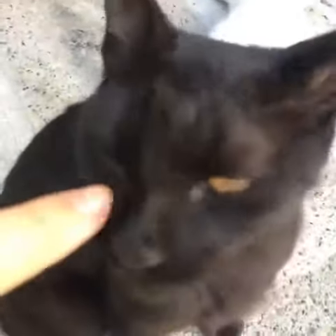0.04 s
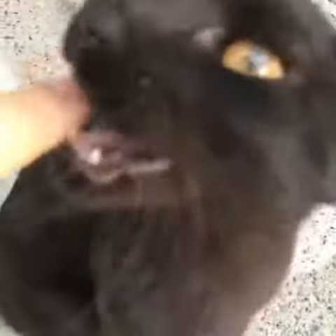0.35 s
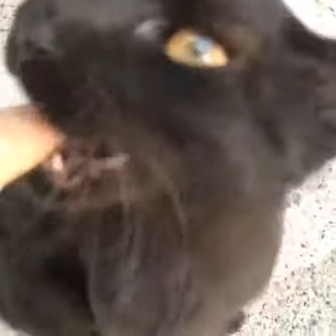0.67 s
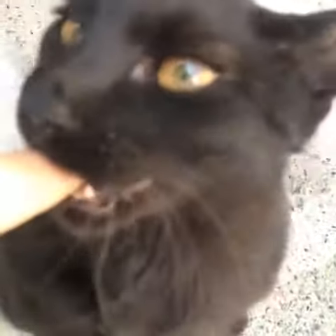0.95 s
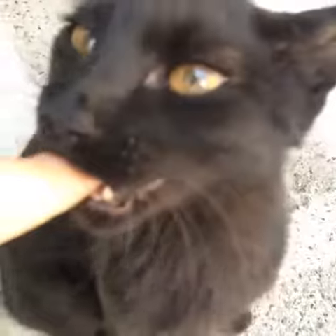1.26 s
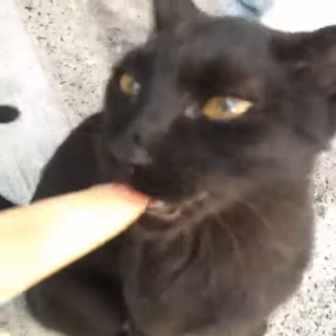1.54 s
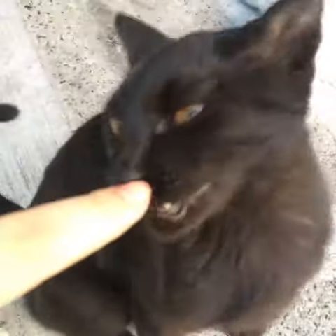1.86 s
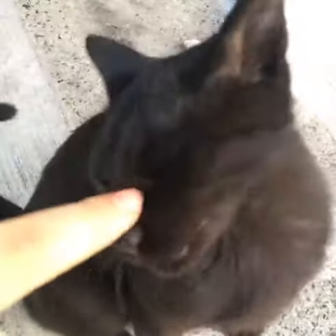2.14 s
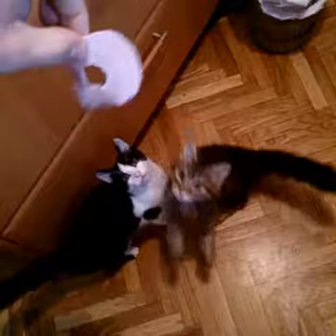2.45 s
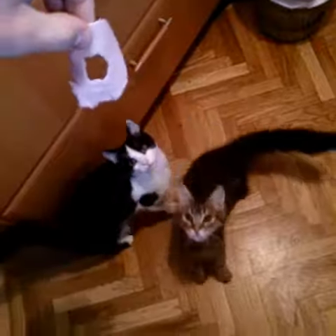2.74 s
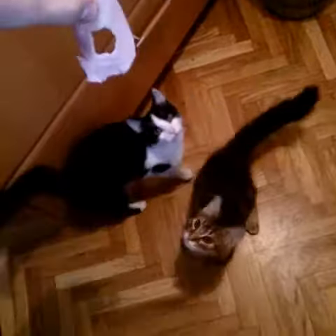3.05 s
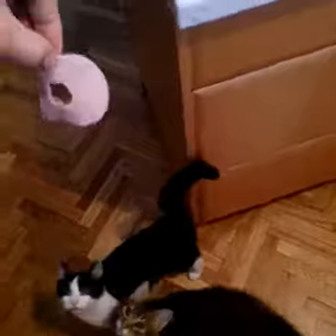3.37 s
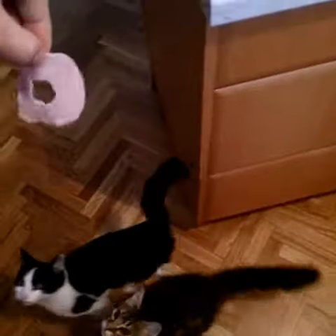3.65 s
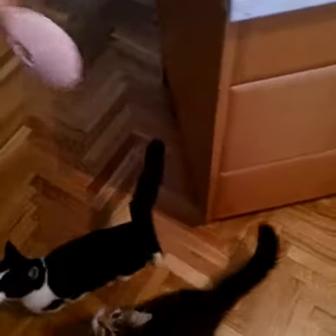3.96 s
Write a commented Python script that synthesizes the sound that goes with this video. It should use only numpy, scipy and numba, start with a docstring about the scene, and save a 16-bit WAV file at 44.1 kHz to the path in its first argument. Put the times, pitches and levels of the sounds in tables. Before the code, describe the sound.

A cat gives a dry rattling trill from 0.3 to 0.5 seconds, with small wet mouth clicks and a thin wheeze, then a longer, higher trill from 1.1 to 1.7. A louder outdoor rumble, a distant engine drone and soft wind thumps on the microphone run throughout this part. At 2.4 it cuts to a quiet room with faint electrical hum and light ticks at 2.5, 3.2 and 3.4.

```python
"""Outdoors, over a rumble and the drone of a distant engine, soft wind buffets hit the microphone.
A cat nibbles at a finger: first small wet mouth clicks, a thin airy wheeze and a dry rattling trill,
then, just after 1 s, a second, higher trill; each beat is a rasp and a snap that ring the mouth.
At 2.4 s the scene cuts to a quiet room with mains hum, where three light ticks follow."""
import sys
import numpy as np
from scipy import signal
from scipy.fft import rfft, irfft
from scipy.io import wavfile
from scipy.ndimage import uniform_filter1d
from numba import njit

SR = 44100
rng = np.random.default_rng(int(sys.argv[2]) if len(sys.argv) > 2 else 0)


def to_wav(sig):
    """Store sig (one row per channel, or 1-D mono) as 16-bit WAV at the path in sys.argv[1].

    Samples outside -1..1 are clipped; the rate is SR.
    """
    pcm = np.clip(np.atleast_2d(sig), -1, 1) * 32767
    pcm = np.round(pcm).astype(np.int16)
    wavfile.write(sys.argv[1], SR, pcm.T)  # frames by channels


N = 176400
CUT_S = 2.403

# spectrum of the outdoor rumble (frequency [Hz], relative level [dB])
RUMBLE_SPECTRUM = [(12, -37), (38, -16), (56, -2.5), (101, -1.5), (163, -5), (196, -4.5), (293, -12),
                   (326, -16.5), (373, -10), (404, -17), (558, -24.5), (621, -19.5), (673, -24.5),
                   (1120, -28.5), (1210, -28.5), (3730, -44.5), (15000, -65.5)]
# course of its bass, middle and treble (time [s], relative level [dB])
BASS_LEVEL = [(0, -42), (.15, -47), (.25, -43.5), (.55, -44), (.63, -41), (.76, -44.5), (.95, -48),
              (1.07, -45), (1.3, -45), (1.7, -43), (2.05, -47), (2.14, -44.5), (2.39, -45)]
MIDDLE_LEVEL = [(0, -46), (.3, -43.5), (.8, -45), (1.5, -46), (2.0, -48.5), (2.39, -50.5)]
TREBLE_LEVEL = [(0, -59.5), (.5, -59.5), (1.1, -61), (1.8, -60), (2.4, -62)]
# a low moan and a faint rustle that come up late in the rumble (time [s], level [dB])
MOAN_LEVEL = [(1.3, -68), (1.6, -54), (2.1, -57.5), (2.4, -56.5)]
RUSTLE_LEVEL = [(1.55, -87), (1.85, -80), (2.13, -84), (2.25, -83), (2.4, -78.5)]
# drone lines of the distant engine (frequency [Hz], relative level [dB])
ENGINE_LINES = [(194, -52.5), (246, -55), (291, -58), (466, -63.5)]
# swell of its lowest line and of its whine (time [s], relative level [dB])
ENGINE_SWELL = [(0, -55), (.27, -40.5), (.5, -45.5), (.7, -49), (1.0, -46.5), (1.47, -50.5), (1.6, -43.5),
                (1.83, -42.5), (2.05, -54), (2.39, -60)]
WHINE_LEVEL = [(0, -55), (.4, -58), (1.0, -56), (1.6, -54.5), (2.05, -49.5), (2.4, -58.5)]
# wind on the microphone (time [s], envelope peak [dB], frequency [Hz])
WIND_BUFFETS = [(.176, -31, 134), (0.707, -28.5, 82), (0.808, -30.5, 99), (.892, -26.5, 105),
                (.995, -31, 140), (1.194, -34, 91), (2.219, -34.5, 124)]

# spectrum of the room tone (frequency [Hz], relative level [dB])
ROOM_SPECTRUM = [(12, 5), (22, 3), (38, -3.5), (70, -15), (110, -21.5), (250, -23.5), (420, -28),
                 (1000, -29), (1500, -33.5), (2100, -32), (3300, -38), (6000, -38.5), (10000, -41),
                 (15500, -41)]
# thin hiss in the room (time [s], level [dB])
HISS_LEVEL = [(2.45, -92), (3.0, -91.5), (3.55, -89), (3.75, -93), (3.95, -87)]
# mains hum (harmonic [number], relative level [dB])
HUM_LINES = [(1, -67.5), (2, -82), (3, -81.5), (4, -82.5), (5, -91.5), (6, -87.5), (7, -86.5), (10, -94.5),
             (11, -95.5), (12, -88), (13, -91.5), (15, -91), (16, -95)]
# ticks in the room (time [s], peak [dB], tilt [dB/octave], relative thud [dB], second mode boost [dB])
ROOM_TICKS = [(2.498, -53.5, 3.5, -25, -4.5), (3.2245, -46, 4, 0, 7), (3.3833, -46.5, 3.5, -16, -11)]
# modes of the ticking object (frequency [Hz], width [Hz], relative level [dB])
OBJECT_MODES = [(1080, 480, 4.5), (2200, 590, 5), (3100, 1300, -3.5), (4320, 960, -9), (5420, 1100, -15.5),
                (7500, 1360, -2)]

# the cat's airy wheeze (time [s], centre [Hz], level [dB])
WHEEZE_PATH = [(.08, 1640, -76), (.15, 1570, -64), (.2, 1490, -55.5), (.29, 1420, -55), (.37, 1320, -57.5),
               (.47, 1410, -64), (.6, 1350, -70), (.85, 1220, -75)]
# thin whistle under it (time [s], level [dB])
WHISTLE_LEVEL = [(.03, -85), (.12, -59), (.21, -55.5), (.26, -62), (.66, -76), (.77, -60), (.86, -86)]
# wet mouth clicks (time [s], peak [dB], centre [Hz], width [Hz], decay [s])
SALIVA_CLICKS = [(0.098, -44, 5940, 7500, 0.0004), (.305, -50, 7060, 4500, 0.00045),
                 (0.3412, -41, 11300, 7500, 0.00056), (0.353, -53, 10100, 6500, .0005),
                 (0.363, -44.5, 2900, 1800, 0.00096), (0.457, -44, 1990, 680, 0.002),
                 (0.477, -51, 10600, 8000, 0.00035), (0.624, -52.5, 10200, 9900, 0.0016)]
# wet smears of the lips (time [s], spread in time [s], level [dB])
LIP_SMEARS = [(.345, 0.016, -75), (.484, 0.024, -78)]
# beats of the lower and the higher trill (time of the snap [s], snap level [dB], rasp level [dB])
LOW_BEATS = [(.262, -66, -65), (0.306, -58.5, -64), (0.348, -60, -60), (.391, -54, -63),
             (.432, -52.5, -65.5), (.465, -62, -70)]
HIGH_BEATS = [(1.151, -56, -74), (1.196, -55, -63), (1.239, -49.5, -61.5), (1.284, -52.5, -61.5),
              (1.329, -52, -62.5), (1.377, -52.5, -63), (1.421, -52.5, -63.5), (1.466, -51, -63.5),
              (1.511, -55.5, -64.5), (1.556, -60, -63), (1.6, -55, -75), (1.643, -61, -78),
              (1.685, -62, -80)]
# mouth resonances in each trill (centre [Hz], width [Hz], relative level [dB], relative glide [1/s])
LOW_RESONANCES = [(3670, 430, 6, 0), (5470, 1200, -4.5, 0)]
HIGH_RESONANCES = [(4530, 460, 7.5, -.03), (5030, 3100, -3.5, -0.18), (6150, 920, 2, -0.26),
                   (7800, 1100, -7.5, -0.000014)]


def undb(db):
    """Decibels to gain."""
    return 10 ** (np.asarray(db) / 20)


def unit(x):
    """Scale to rms 1."""
    return x / np.sqrt(np.mean(x ** 2))


def curve(rows, column=1):
    """A column of a table, joined by straight lines in time."""
    rows = np.array(rows)
    return np.interp(np.arange(N) / SR, rows[:, 0], rows[:, column])


def bell(x, spread):
    """A Gaussian bump of height 1 at x = 0."""
    return np.exp(-.5 * (x / spread) ** 2)


def impulse(at_s):
    """A single sample of height 1."""
    return 1. * (np.arange(N) == int(at_s * SR))


@njit
def bandpass(x, hz, width):
    """State-variable band-pass with a moving centre."""
    y, band_state, low_state = np.empty(len(x)), 0., 0.
    for i in range(len(x)):
        g, damping = np.tan(np.pi * hz[i] / SR), width / hz[i]
        band = (band_state + g * (x[i] + 1e-18 - low_state)) / (1 + g * (g + damping))
        band_state = 2 * band - band_state
        low_state += 2 * g * band
        y[i] = damping * band
    return y


def ring(x, hz, width):
    """A resonance with steep skirts: two band-passes in a row."""
    hz = np.minimum(hz + np.zeros(N), .45 * SR)
    return bandpass(bandpass(x, hz, float(width)), hz, float(width))


def noise():
    """White noise."""
    return rng.standard_normal(N)


def noise_band(hz, width):
    """Noise of rms 1 through one resonance."""
    return unit(ring(noise(), hz, width))


def coloured(spectrum, lo_hz=0, hi_hz=SR):
    """Noise of rms 1 with a given spectrum, between two edges."""
    hz, points = np.arange(N // 2 + 1) * SR / N, np.array(spectrum)
    gain = undb(np.interp(np.log(hz + 1), np.log(points[:, 0]), points[:, 1]))
    return unit(irfft(rfft(noise()) * gain * (hz > lo_hz) * (hz <= hi_hz), N))


def walk(rate):
    """Random values held 1 / rate s and smoothed twice; rms 1."""
    hold = int(SR / rate)
    steps = np.repeat(noise()[:N // hold + 1], hold)
    return unit(uniform_filter1d(uniform_filter1d(steps, hold), hold)[:N])


def tones(lines, waver_db, drift, rate):
    """Sines that waver in pitch and level, centred 1.5 * waver_db under their listed level."""
    out = 0
    for hz, db in lines:
        gain = np.sqrt(2) * undb(db + waver_db * (walk(rate) - 1.5))
        cycles = np.cumsum(hz * (1 + drift * walk(rate))) / SR + rng.random()
        out += gain * np.sin(2 * np.pi * cycles)
    return out


def room_tone():
    """The bed indoors: faint room noise, a thin hiss and mains hum."""
    air = coloured(ROOM_SPECTRUM) * undb(-66)
    hiss = noise_band(hz=7560, width=2100) * undb(curve(HISS_LEVEL))
    mains_hz = 49
    hum = tones([(k * mains_hz, db) for k, db in HUM_LINES], waver_db=.85, drift=.00097, rate=2.81)
    return air + hiss + hum


def outdoor_rumble():
    """The bed outdoors: a rumble fluttering in three ranges, a low moan and a faint rustle."""
    low_hz, high_hz = 167.2, 901  # edges of the middle range
    bass = coloured(RUMBLE_SPECTRUM, hi_hz=low_hz) * undb(curve(BASS_LEVEL) - .5 + walk(22.93))
    middle = coloured(RUMBLE_SPECTRUM, low_hz, high_hz) * undb(curve(MIDDLE_LEVEL) - 1.5 + walk(29.9))
    treble = coloured(RUMBLE_SPECTRUM, lo_hz=high_hz) * undb(curve(TREBLE_LEVEL) + .5 * walk(24.73))
    moan = noise_band(hz=398, width=200) * undb(curve(MOAN_LEVEL))
    rustle = noise_band(hz=7700, width=22000) * undb(curve(RUSTLE_LEVEL) + 2 * walk(81))
    return bass + middle + treble + moan + rustle


def distant_engine():
    """A drone far from the microphone: a swelling lowest line, wavering upper ones and a whine."""
    lowest_hz, whine_hz = 96.8, 371.7
    lowest = tones([(lowest_hz, -2)], waver_db=-1.5, drift=.0057, rate=8.16) * undb(curve(ENGINE_SWELL))
    upper = tones(ENGINE_LINES, waver_db=2.5, drift=.00652, rate=6.805)
    whine = tones([(whine_hz, 0)], waver_db=3, drift=.0076, rate=14) * undb(curve(WHINE_LEVEL))
    return lowest + upper + whine


def wind_buffets(t):
    """Eddies hit the microphone: each is a quick push and pull of pressure, heard as a soft thump."""
    out = 0
    for at_s, db, hz in WIND_BUFFETS:
        cycles = hz * (t - at_s)
        out -= undb(db) * np.sin(2 * np.pi * cycles) * bell(cycles, spread=.39)
    return out


def ticks(t):
    """Dry taps in the room: a sharp edge, heavily damped modes and a soft thud."""
    thud_hz, thud_decay_s, edge_db = 172, .0013, -20
    out = 0
    for at_s, db, tilt, thud_db, second_db in ROOM_TICKS:
        blow, age = impulse(at_s), np.maximum(t - at_s, 0)
        body = undb(edge_db) * blow
        for k, (hz, width, mode_db) in enumerate(OBJECT_MODES):
            # the spot struck weights the second mode
            weight_db = second_db * (k == 1) + tilt * np.log2(hz / OBJECT_MODES[1][0])
            body += (-1) ** k * undb(mode_db + weight_db) * ring(blow, hz, width)
        thud = np.sin(2 * np.pi * thud_hz * age) * np.exp(-age / thud_decay_s)
        out += undb(db) * (body / np.abs(body).max() + undb(thud_db) * thud)
    return out


def wheeze(t):
    """The cat's breath through two narrow resonances, one falling and one steady in pitch."""
    falling = noise_band(curve(WHEEZE_PATH), width=240)
    falling *= undb(curve(WHEEZE_PATH, column=2) + 2 * walk(140))
    whistle = noise_band(hz=1216, width=46) * undb(curve(WHISTLE_LEVEL))
    return falling * (t < WHEEZE_PATH[-1][0]) + whistle * (t < WHISTLE_LEVEL[-1][0])


def mouth_clicks(t):
    """Saliva snaps between lips and teeth, with short smears of fizz."""
    clicks = 0
    for at_s, db, hz, width, decay_s in SALIVA_CLICKS:
        fizz = undb(-8) * noise() * (t >= at_s) * np.exp(-np.abs(t - at_s) / decay_s)
        burst = ring(impulse(at_s) + fizz, hz, width)
        clicks += undb(db) * burst / np.abs(burst).max()
    smears = sum(undb(db) * bell(t - at_s, spread_s) for at_s, spread_s, db in LIP_SMEARS)
    grains = noise() * undb(3.6 * walk(750))
    return clicks + smears * unit(ring(grains, hz=12200, width=14000))


def trill(t, beats, resonances, rasp_s):
    """Each beat is a grainy rasp that ends in a snap; both ring the cat's mouth."""
    times = np.array(beats)[:, 0]
    snaps = sum(undb(db) * bell(t - at_s, spread=.002) for at_s, db, _ in beats)
    rasps = sum(undb(db) * ((t > at_s - rasp_s) & (t < at_s)) for at_s, _, db in beats)
    grainy_rasps = uniform_filter1d(rasps, size=220) * undb(walk(300))
    from_middle_s = np.clip(t, times[0] - rasp_s, times[-1]) - times.mean()
    dulling = 12 * from_middle_s  # dB per octave: the mouth grows duller along the trill
    air = 0
    for hz, width, db, glide in resonances:
        centre_hz = hz * np.exp(glide * from_middle_s) + .1 * width * walk(44.7)
        gain = undb(db + dulling * np.log2(resonances[1][0] / hz))
        air += gain * ring(noise(), centre_hz, width)
    air /= np.std(air[(t > times[0]) & (t < times[-1])])
    spray = undb(-25) * snaps * noise_band(hz=11000, width=14000)
    return np.hypot(snaps, grainy_rasps) * air + spray


def scene():
    """One microphone, two places: the cat outdoors, then an abrupt cut to the room."""
    t = np.arange(N) / SR
    low_trill = trill(t, LOW_BEATS, LOW_RESONANCES, rasp_s=.0175)
    high_trill = trill(t, HIGH_BEATS, HIGH_RESONANCES, rasp_s=.026)
    cat = wheeze(t) + mouth_clicks(t) + low_trill + high_trill
    outdoors = outdoor_rumble() + distant_engine() + wind_buffets(t) + cat
    indoors = room_tone() + ticks(t)
    before_cut = uniform_filter1d(1. * (t < CUT_S), size=32)
    return (before_cut * outdoors + (1 - before_cut) * indoors)[None]


def record(dry):
    """The recorder cuts the top with a steep low-pass."""
    top_hz = 15600
    return signal.sosfilt(signal.ellip(10, .2, 70, top_hz, fs=SR, output="sos"), dry)


dry = scene()
out = record(dry)
to_wav(out)
```